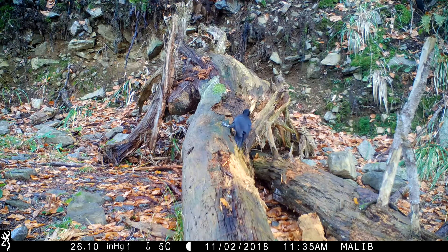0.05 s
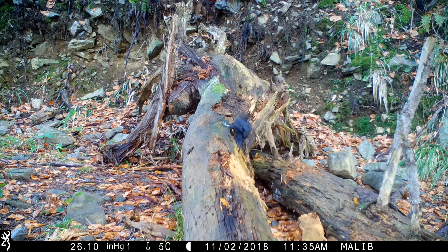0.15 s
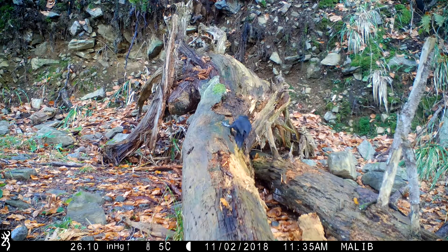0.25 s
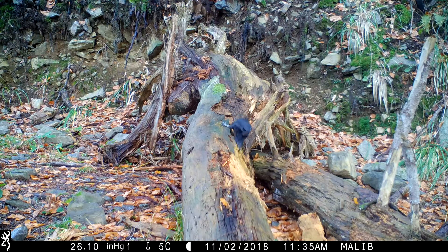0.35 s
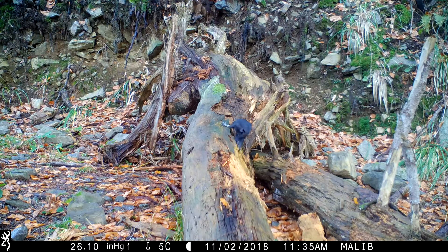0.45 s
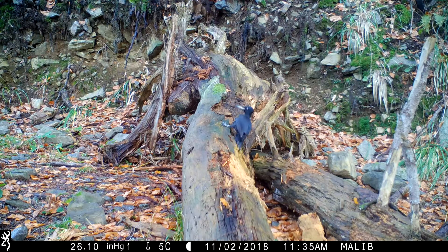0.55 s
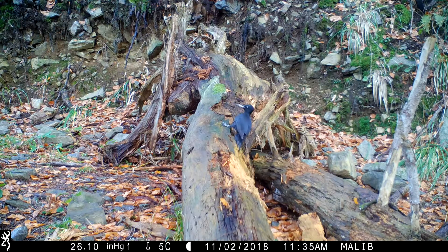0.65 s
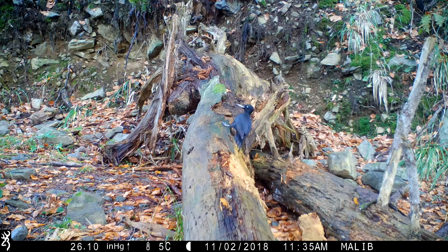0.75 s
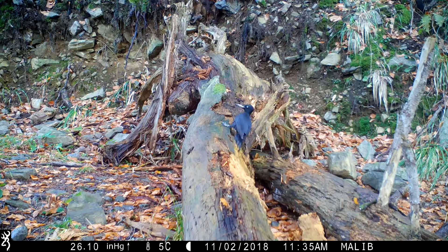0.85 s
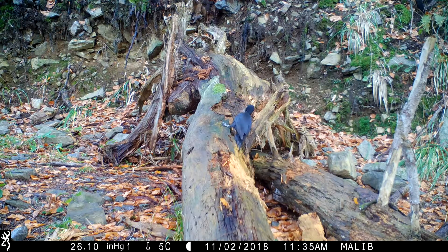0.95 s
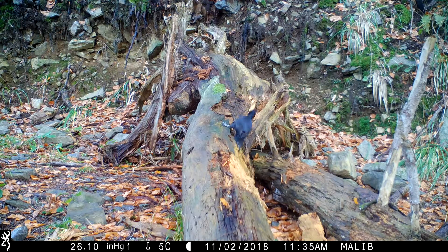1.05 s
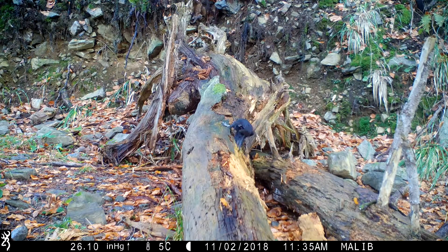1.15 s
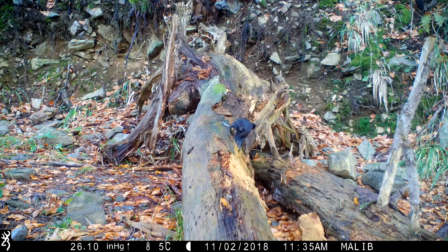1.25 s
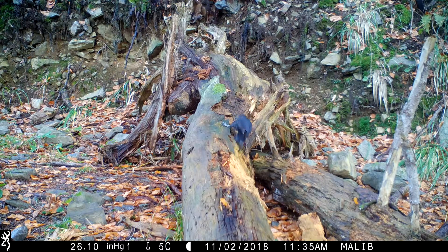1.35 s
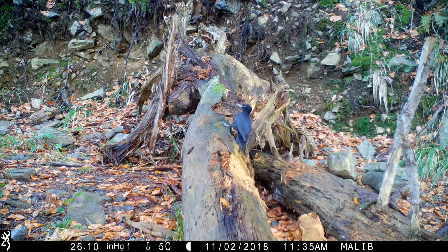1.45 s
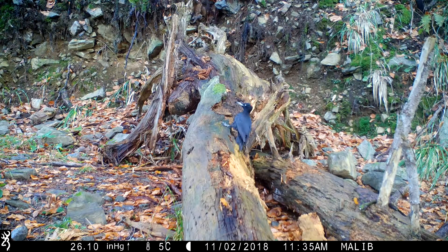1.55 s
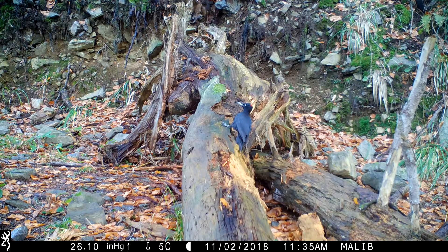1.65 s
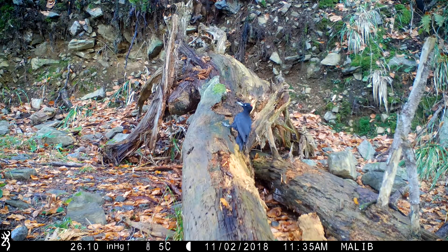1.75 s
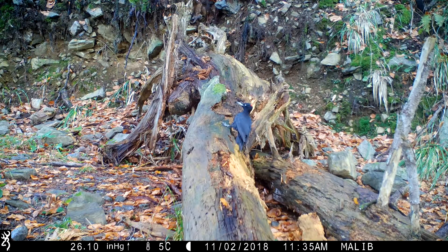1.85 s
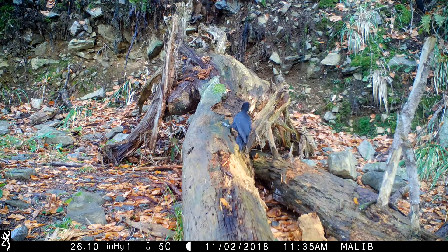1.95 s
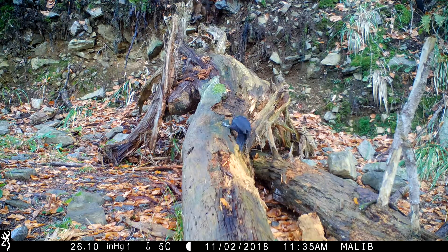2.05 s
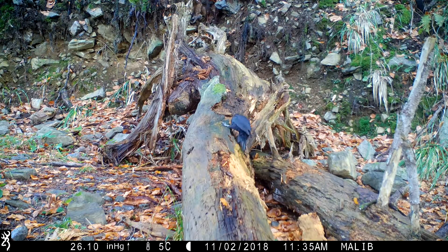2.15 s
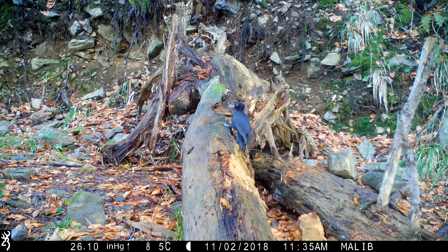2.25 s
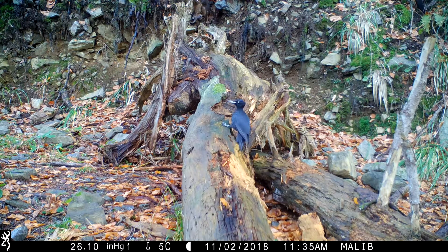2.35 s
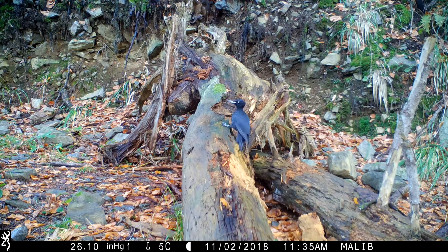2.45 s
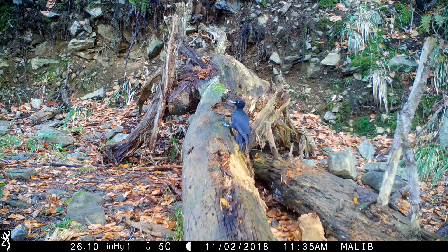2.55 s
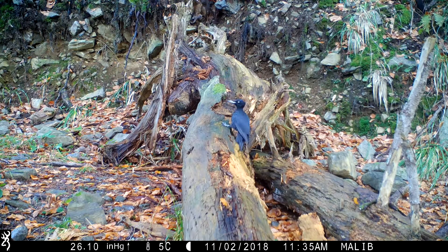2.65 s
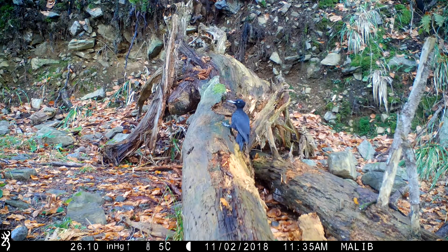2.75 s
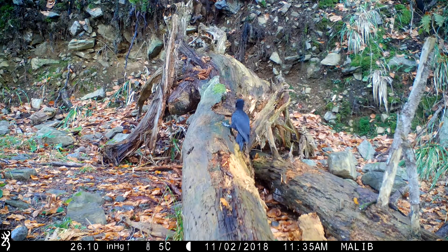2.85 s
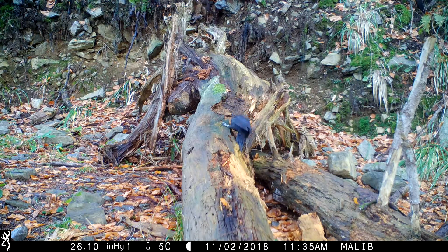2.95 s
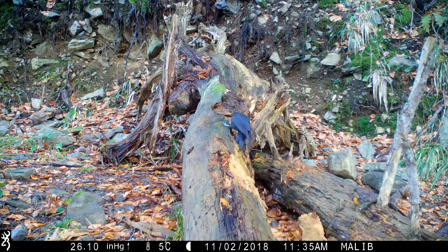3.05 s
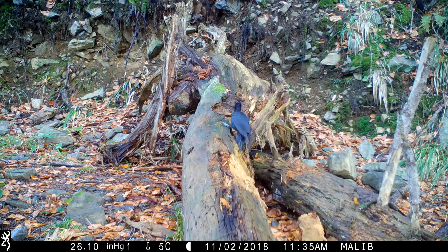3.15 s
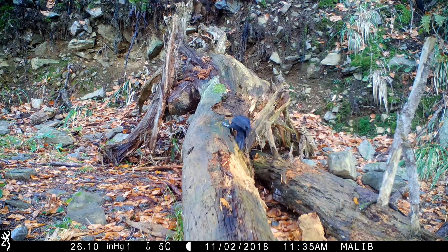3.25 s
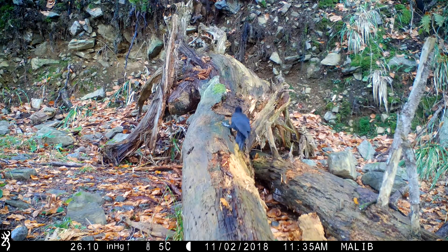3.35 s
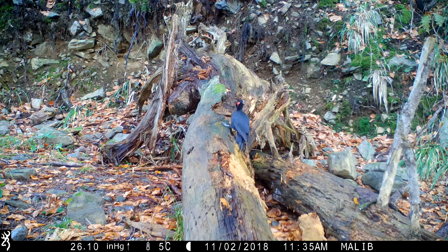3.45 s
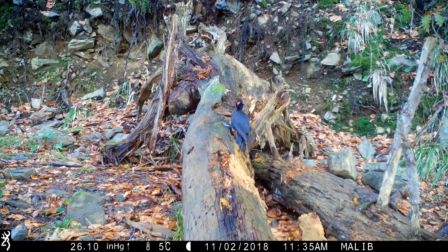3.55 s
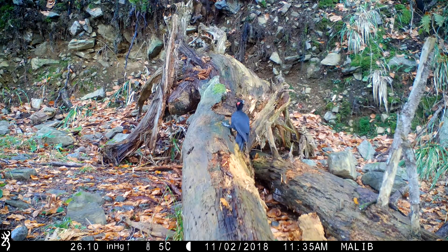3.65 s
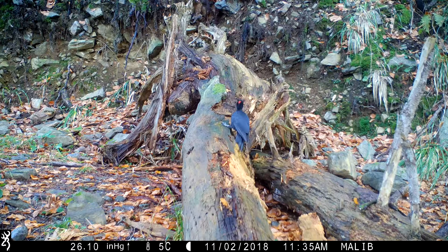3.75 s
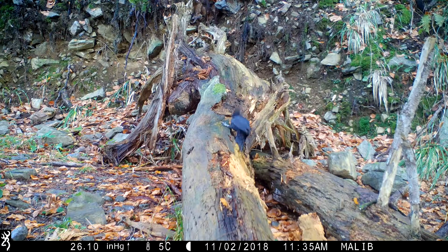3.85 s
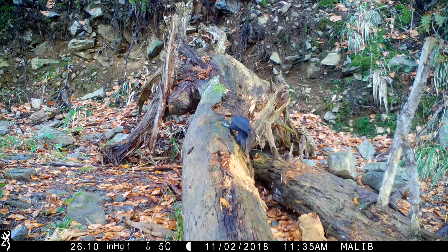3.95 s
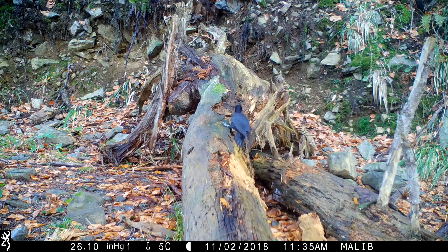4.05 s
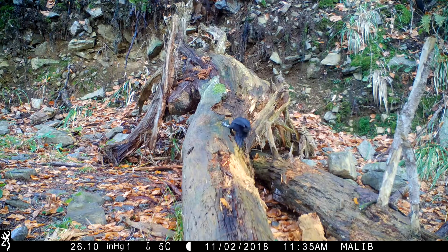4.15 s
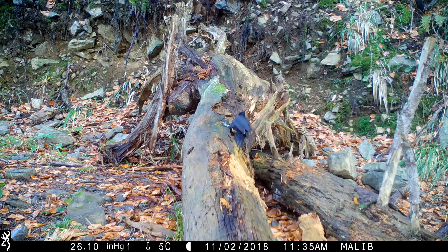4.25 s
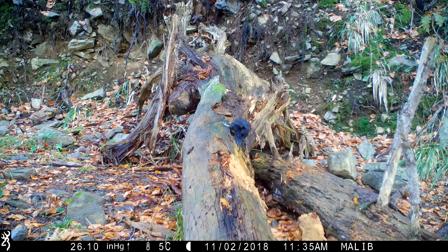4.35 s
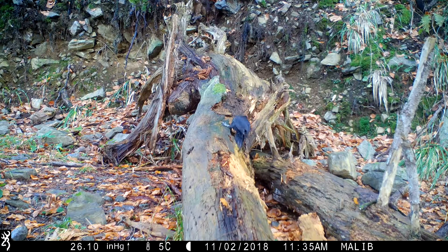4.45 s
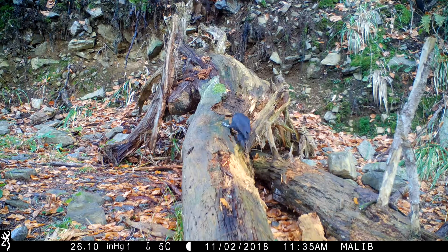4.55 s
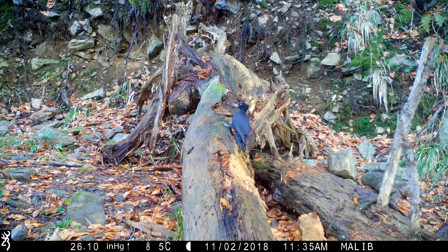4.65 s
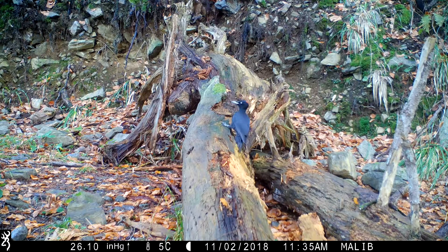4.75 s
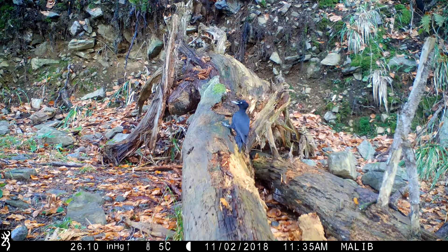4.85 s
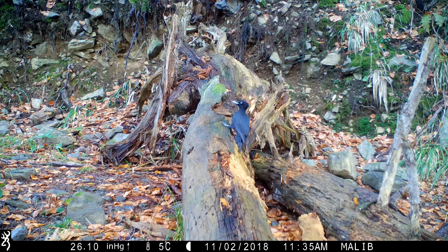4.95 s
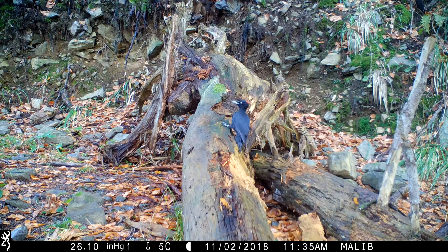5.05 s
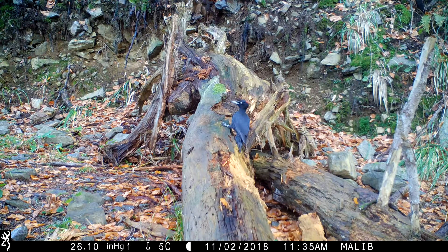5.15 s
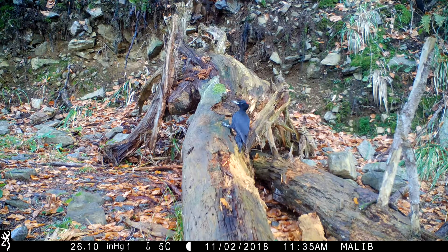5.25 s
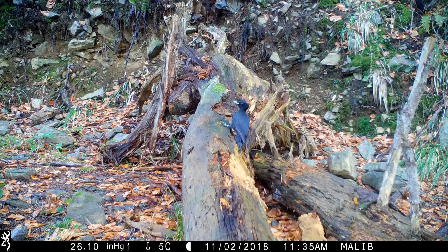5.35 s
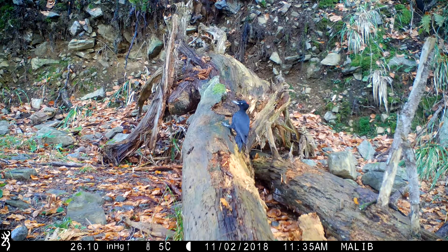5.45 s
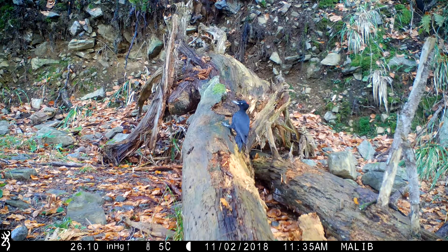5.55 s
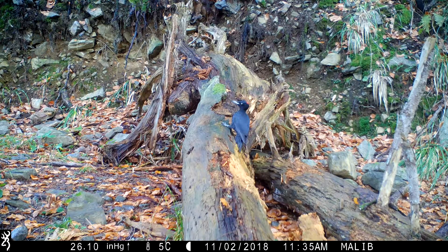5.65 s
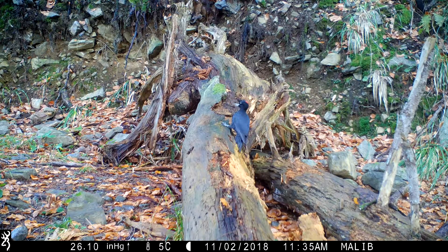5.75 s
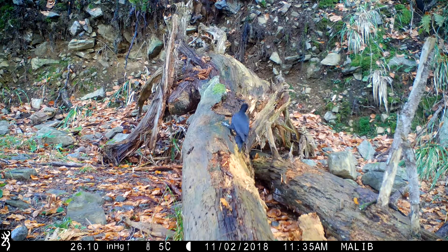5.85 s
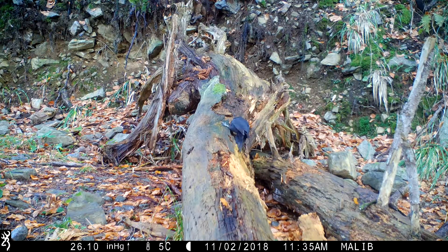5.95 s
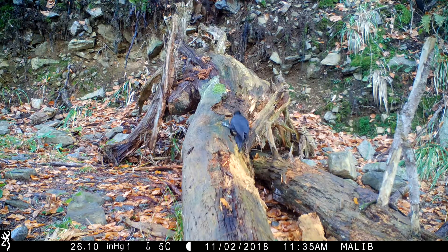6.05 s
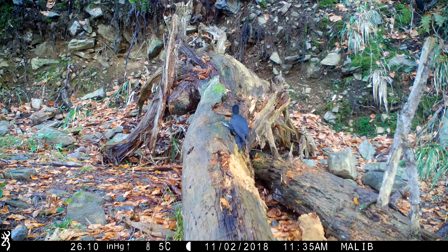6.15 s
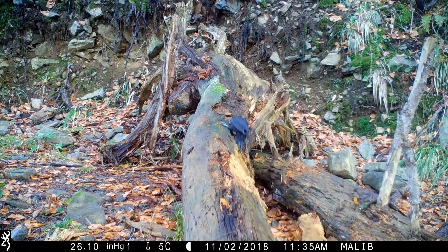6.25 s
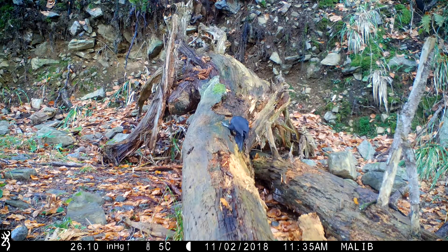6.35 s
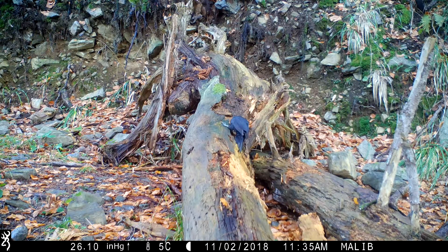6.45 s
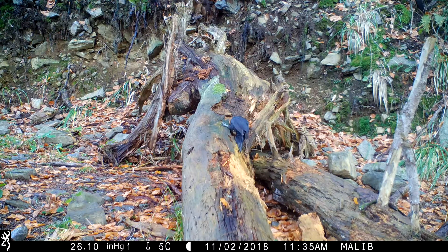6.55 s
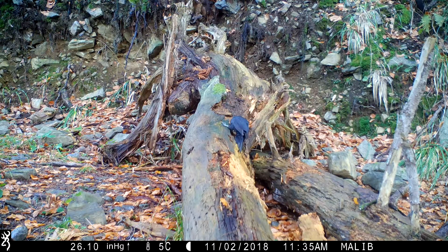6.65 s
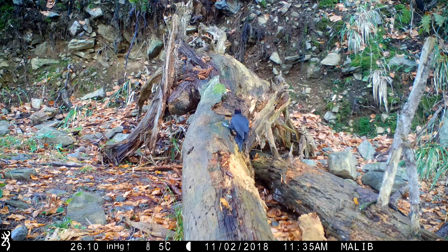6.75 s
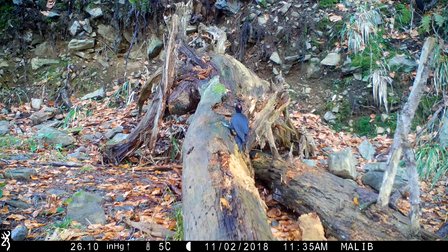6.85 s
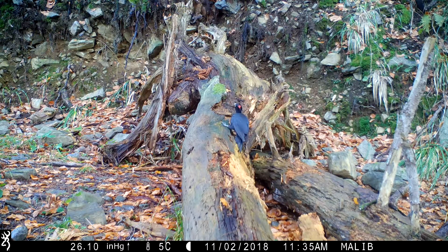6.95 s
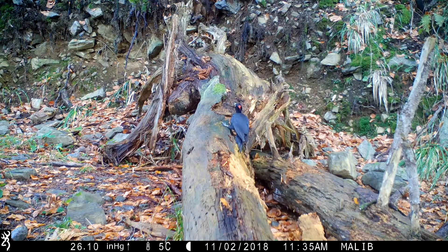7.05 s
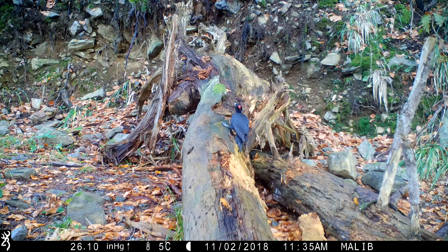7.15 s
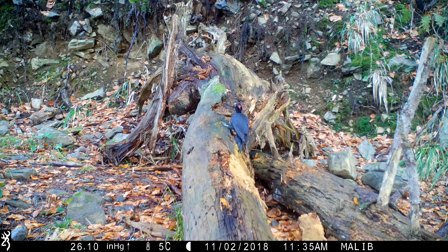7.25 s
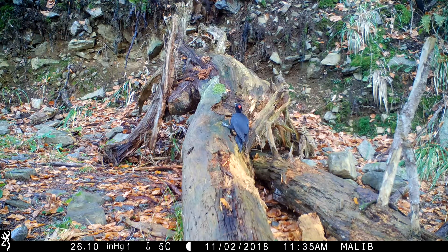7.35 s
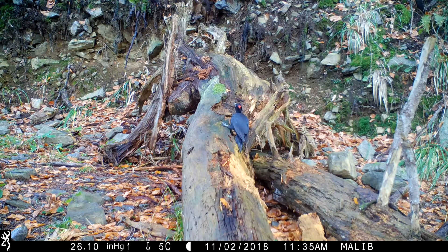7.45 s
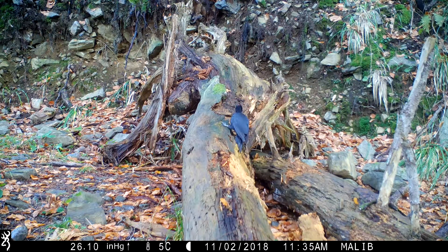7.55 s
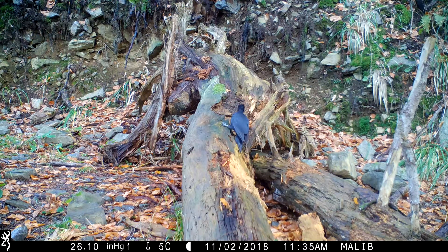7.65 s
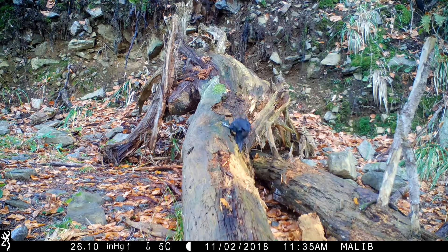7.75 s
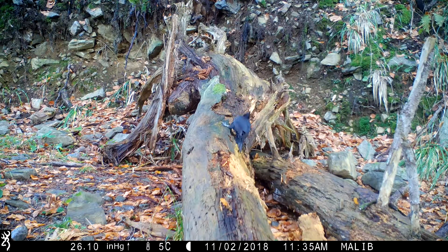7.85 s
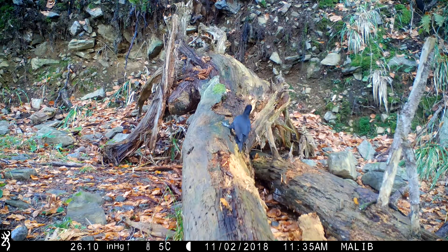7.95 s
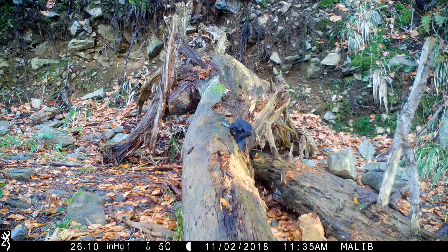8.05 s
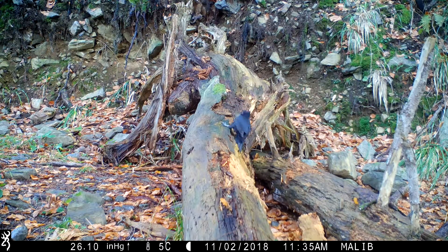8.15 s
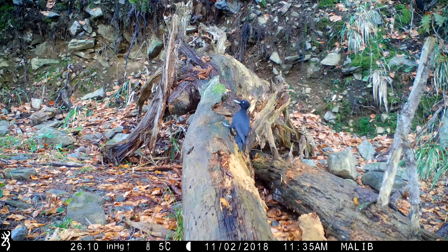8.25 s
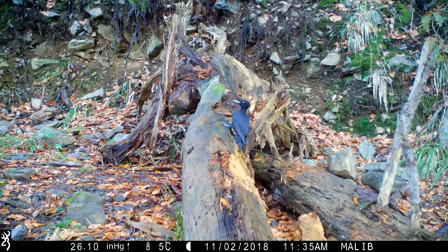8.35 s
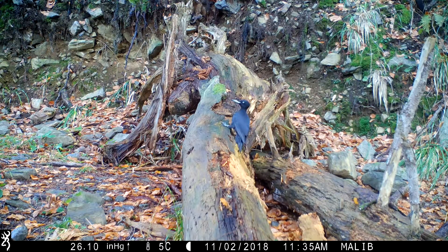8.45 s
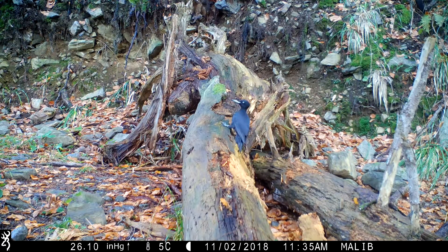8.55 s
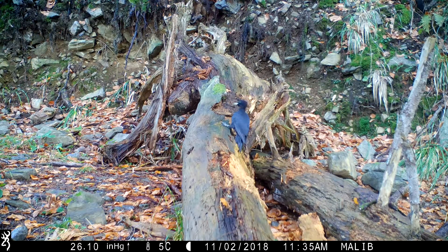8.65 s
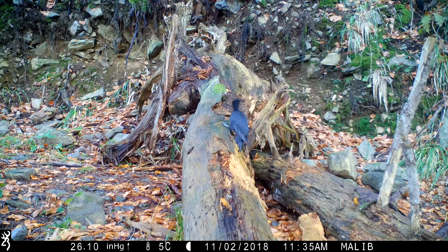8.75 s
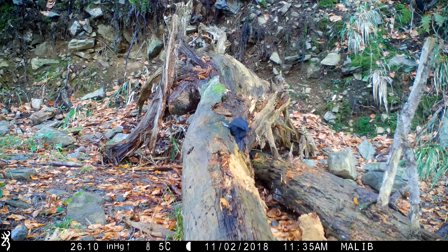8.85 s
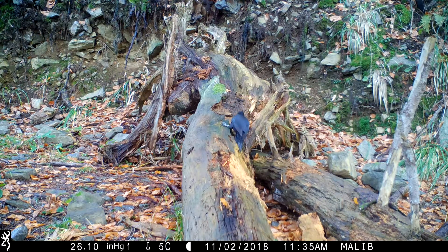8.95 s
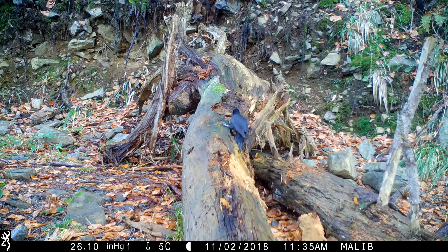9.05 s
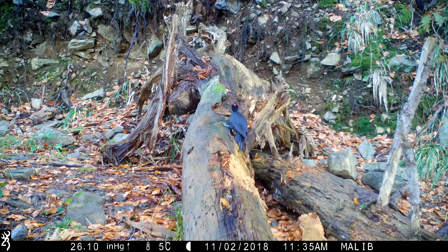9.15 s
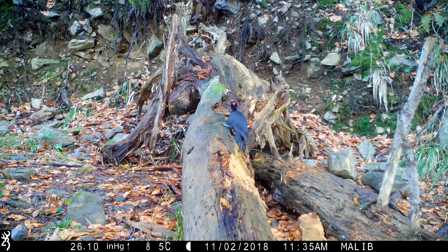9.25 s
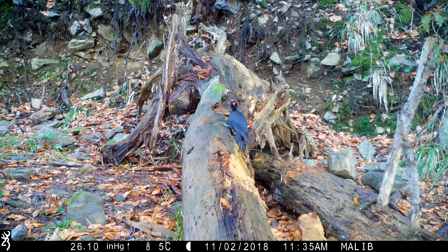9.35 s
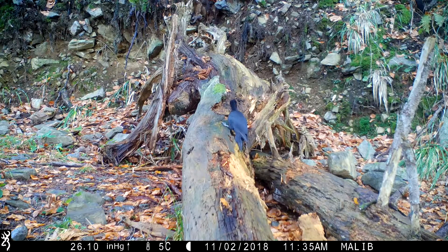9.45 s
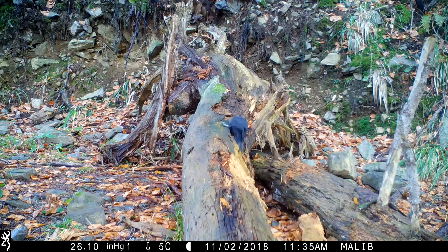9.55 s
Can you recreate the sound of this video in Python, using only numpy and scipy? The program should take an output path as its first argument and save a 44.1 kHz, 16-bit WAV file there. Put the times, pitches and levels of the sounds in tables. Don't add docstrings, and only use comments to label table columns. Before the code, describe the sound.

A woodpecker chips at a rotten log with irregular dry cracks and faint hollow knocks, over a steady mid-range hiss in a quiet forest.

```python
import sys
import numpy as np
from scipy import signal
from scipy.io import wavfile
from scipy.ndimage import uniform_filter1d

SR = 44100
rng = np.random.default_rng(int(sys.argv[2]) if len(sys.argv) > 2 else 0)


def voltage_ratio(level):
    return 10 ** (np.asarray(level, float) / 20)


def dump(signal):
    limited = np.clip(np.atleast_2d(signal).T, -1, 1)
    pcm = np.round(limited * 32767).astype(np.int16)
    wavfile.write(sys.argv[1], SR, pcm)


N = 422919


def evened(x):
    return x / np.sqrt(np.mean(x ** 2) + 1e-20)


def peaked(x):
    return x / (abs(x).max() + 1e-12)


def cut(x, hz, kind):
    return signal.sosfilt(signal.butter(4, hz, kind, fs=SR, output="sos"), x)


def ring(force, hz, t60):
    t = np.arange(len(force)) / SR
    mode = t * voltage_ratio(-60 * t / t60) * np.sin(2 * np.pi * hz * t)
    return peaked(signal.fftconvolve(force, mode)[:len(force)])


def place(mix, peak_s, hit):
    start_s = peak_s - abs(hit).argmax() / SR
    part = mix[round(start_s * SR):][:len(hit)]
    part += hit[:len(part)]


def crush(crush_s, chance):
    u = np.arange(len(chance)) / SR / max(crush_s, .0002)
    main_break = np.zeros(len(u))
    main_break[abs(u - 2).argmin()] = 40
    snaps = chance ** 3 * np.exp(-(u - 2) ** 2)
    return cut(main_break + snaps, 600, "high")


def crack(wall_db, patch_db, patch_hz, splinter_db, crush_s):
    bare = crush(crush_s, rng.standard_normal(2000))
    force = cut(bare, 3300, "low")
    beak = ring(cut(bare, 5200, "low"), 4300, .0025)
    wall = ring(force, 1150, .008) + .3 * ring(force, 760, .009)
    patch = ring(force, patch_hz, .0064) - .27 * ring(force, 1.3 * patch_hz, .005)
    splinter = ring(force, 2500, .0045) - .71 * ring(force, 3000, .0042)

    sound = voltage_ratio(splinter_db - 24) * beak
    sound += voltage_ratio(wall_db) * peaked(wall)
    sound += voltage_ratio(patch_db) * peaked(patch)
    sound += voltage_ratio(splinter_db) * peaked(splinter)
    return sound


def beak_blows(mix):
    # peak in seconds, log wall in dB, struck patch in dB, patch ring in Hz, splinters in dB.
    blow_rows = [(.2202, -23.5, -30, 1760, -31), (.8495, -35.5, -33.5, 1886, -39),
                 (1.138, -51, -26, 1510, -37), (2.091, -35.5, -29.5, 1327, -50),
                 (3.0088, -33.5, -30, 1590, -38.5), (3.266, -29, -27.5, 1590, -34.5),
                 (3.9272, -29, -30.5, 1703, -38), (4.1887, -29, -18, 1680, -22.5),
                 (5.6210, -36, -29.5, 1700, -38.5), (5.9712, -27.5, -26, 1790, -48),
                 (6.2500, -29.5, -14, 1627, -32), (7.781, -31, -21.5, 1410, -27.5),
                 (8.0688, -33.5, -37, 1555, -27), (8.5552, -39, -29, 2664, -44),
                 (8.875, -28.5, -26.5, 1617, -34)]
    for peak_s, wall_db, patch_db, patch_hz, splinter_db in blow_rows:
        hardness_db = max(wall_db, patch_db, splinter_db) + 27
        crush_s = .0008 * np.exp(-.66 * hardness_db)
        place(mix, peak_s, crack(wall_db, patch_db, patch_hz, splinter_db, crush_s))


def further_cracks(mix):
    # peak in seconds, peak level in dB, patch ring in Hz, crush length in seconds.
    crack_rows = [(.215, -31, 1210, 0.0019), (.224, -38, 1220, 0.00098), (1.134, -32.5, 1530, 0.00089),
                  (1.1435, -39, 1500, .002), (2.0985, -31.5, 2160, .0005), (3.269, -35, 1980, .001),
                  (3.924, -30, 1740, 0.00096), (6.2548, -31, 1340, 0.00086), (7.792, -34, 2650, 0.0041),
                  (7.797, -35, 1220, 0.0028), (7.802, -41, 2730, 0.0053), (8.067, -26, 1570, 0.00065),
                  (8.077, -30, 1520, 0.0016), (8.878, -23.5, 1530, 0.0011), (8.8873, -29, 2400, .0006)]
    for peak_s, db, hz, crush_s in crack_rows:
        place(mix, peak_s, crack(db - 10.5, db, hz, db - 6, crush_s))


def trunk_thuds(mix):
    # peak in seconds, lower mode in dB, upper mode in dB.
    thud_rows = [(.218, -67, -39.5), (1.139, -49.5, -55), (2.101, -41, -36.5), (3.010, -41, -41),
                 (3.268, -41, -32), (3.927, -37, -39), (4.190, -49, -37), (5.9705, -35, -29),
                 (6.2545, -38.5, -36.5), (7.783, -45.5, -51), (8.065, -55, -42), (8.879, -39.5, -37)]
    t = np.arange(4000) / SR
    push = cut(np.exp(-((t - .0025) / .00042) ** 2), 130, "high")
    lower, upper = ring(push, 241, .022), ring(push, 450, .0092)
    for peak_s, lower_db, upper_db in thud_rows:
        place(mix, peak_s, voltage_ratio(lower_db) * lower - voltage_ratio(upper_db) * upper)


def chip_ticks(mix):
    # onset in seconds, peak level in dB, ring in Hz, top end in dB against the ring.
    tick_rows = [(.3335, -35, 2100, -20), (.336, -35, 2000, -18), (.403, -29, 1700, -17),
                 (.495, -38, 1700, -22), (.8471, -21, 1650, -26), (.889, -38, 1800, -24),
                 (1.349, -40, 1470, -25), (1.960, -30, 1250, -30), (2.037, -35, 1500, -30),
                 (2.174, -34, 1700, -26), (2.182, -36, 1610, -18), (2.357, -46, 3600, -8),
                 (2.513, -50, 3600, -12), (2.539, -46, 2500, -10), (3.913, -48, 2500, -10),
                 (3.922, -40, 1710, -12), (4.822, -40, 1810, -12), (5.309, -44, 3500, -22),
                 (5.475, -35, 1210, -22), (5.5135, -41, 2100, -25), (6.663, -33, 2000, -22),
                 (7.1835, -35, 1550, -20), (7.259, -39, 3000, -14), (8.206, -33, 2200, -20),
                 (8.490, -33, 2100, -24), (8.495, -39, 2400, -12), (8.554, -35, 2000, -13),
                 (9.115, -37, 1450, -20)]
    onset_to_peak_s = .0013
    for onset_s, db, hz, top_db in tick_rows:
        force = cut(crush(.0003, rng.standard_normal(1000)), 5400, "low")
        top = voltage_ratio(7) * ring(force, 3100, .0025)
        top += .2 * ring(force, 5700, .002) - .6 * ring(force, 4500, .0025)
        tick = voltage_ratio(db) * (ring(force, hz, .0039) + voltage_ratio(top_db) * top)
        place(mix, onset_s + onset_to_peak_s, tick)


def forest_tail(x):
    t = np.arange(8000) / SR
    sign = rng.choice([-1., 1.], len(t))
    sparse = rng.random(len(t)) < .05
    taps = sign * sparse * voltage_ratio(-60 * t / .051) * (t > .004)
    return signal.oaconvolve(x, taps / np.linalg.norm(taps))[:N]


def noise(curve, patchy_db, swell_db):
    frames, hz = N // 256 + 5, np.fft.rfftfreq(1024, 1 / SR)
    real, imag, patches = rng.standard_normal((frames, 513, 3)).T
    patches = uniform_filter1d(patches, size=12, axis=0)
    patches = evened(uniform_filter1d(patches, size=10, axis=1))
    swell = evened(uniform_filter1d(rng.standard_normal(frames), size=30))
    curve_hz, curve_db = np.transpose(curve)
    tone_db = np.interp(np.log(hz + 1), np.log(curve_hz + 1), curve_db)
    spectra = (real + 1j * imag) * voltage_ratio(tone_db[:, None] + patchy_db * patches + swell_db * swell)
    return evened(signal.istft(spectra, nperseg=1024, noverlap=768)[1][:N])


def water_hiss():
    # frequency in Hz, density in dB per Hz.
    hiss_curve = [(15, -63), (25, -32), (129, -20.5), (250, -11.5), (601, -4), (1100, 0), (1570, 0),
                  (2000, -3), (2730, -6.5), (3500, -16.5), (5000, -33), (6500, -47.5), (8000, -60),
                  (12000, -96)]
    return voltage_ratio(-45.5) * noise(hiss_curve, patchy_db=.33, swell_db=.7)


def sensor_whine():
    t = np.arange(N) / SR
    field_sign = np.sign(np.sin(2 * np.pi * 29.75 * t))
    whine = voltage_ratio(-85.5) * np.sin(2 * np.pi * 7796.25 * t) * field_sign
    return whine + voltage_ratio(-103) * np.sin(2 * np.pi * 15592.4 * t)


def converter_noise():
    # frequency in Hz, density in dB.
    converter_curve = [(3000, -135), (6000, -116), (9000, -116), (11000, -115), (11700, -112),
                       (12500, -115), (16000, -116)]
    return voltage_ratio(-86.2) * noise(converter_curve, patchy_db=0, swell_db=0)


def scene():
    bird = np.zeros(N)
    beak_blows(bird)
    further_cracks(bird)
    trunk_thuds(bird)
    chip_ticks(bird)
    return (bird + voltage_ratio(-21) * forest_tail(bird) + water_hiss())[None]


def top_cut(x):
    return signal.sosfilt(signal.butter(12, 15750, fs=SR, output="sos"), x)


def record(dry):
    mix = dry + sensor_whine() + converter_noise()
    return top_cut(mix)


dry = scene()
out = record(dry)
dump(out)
```